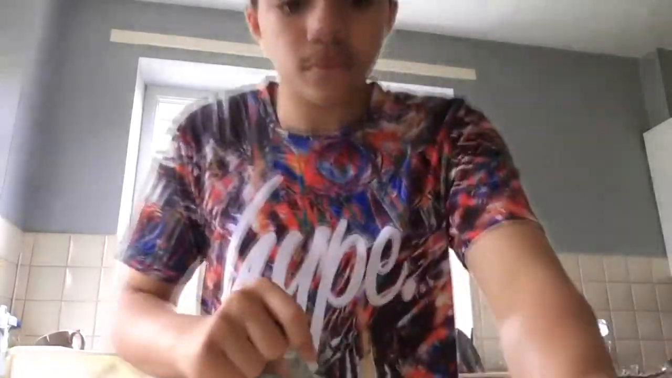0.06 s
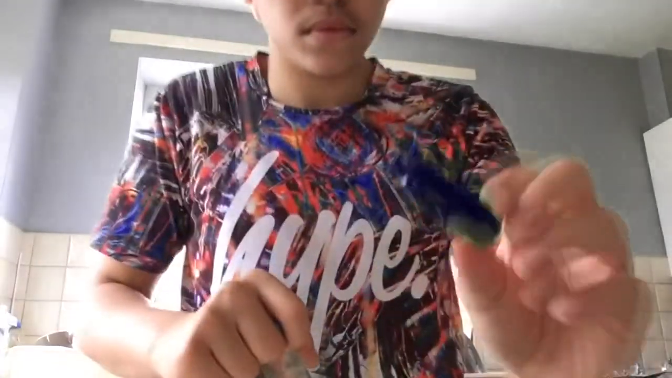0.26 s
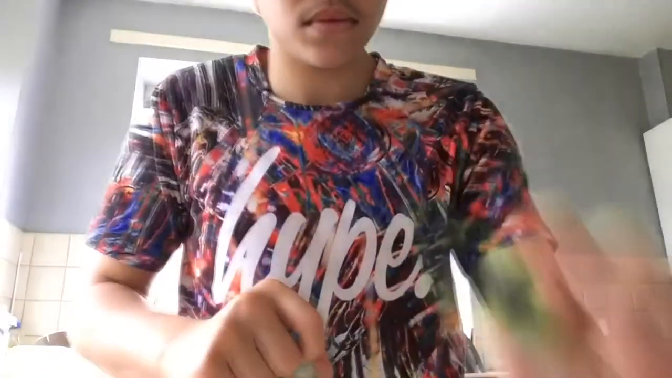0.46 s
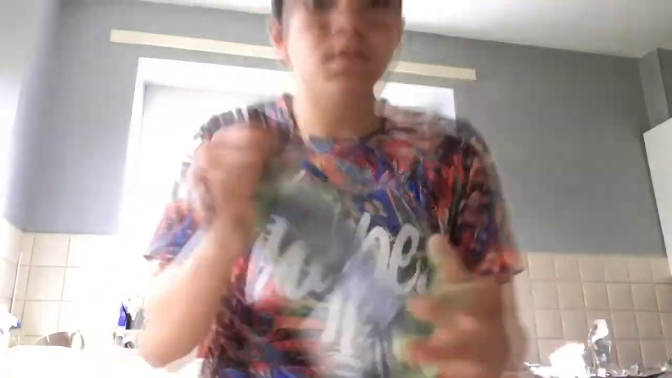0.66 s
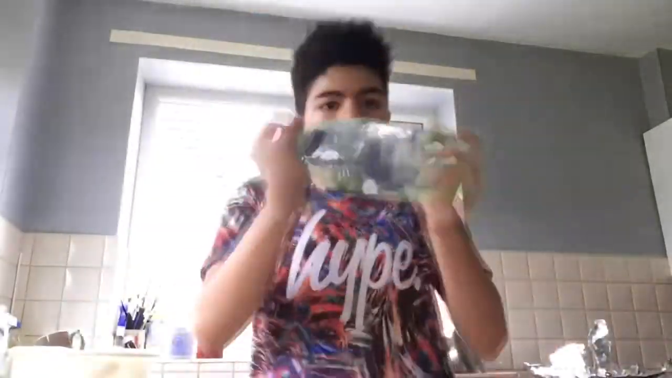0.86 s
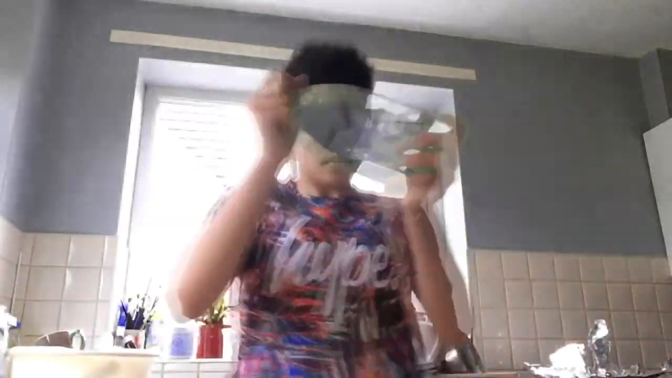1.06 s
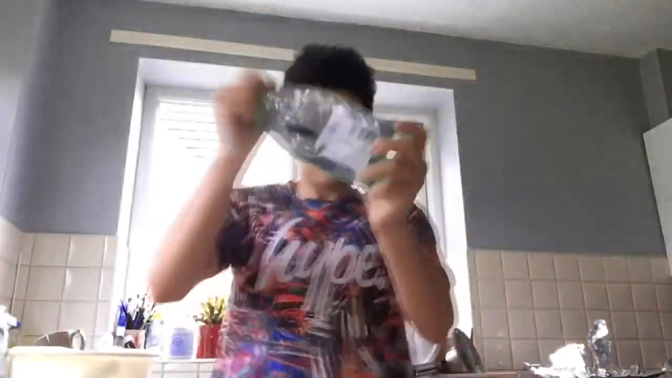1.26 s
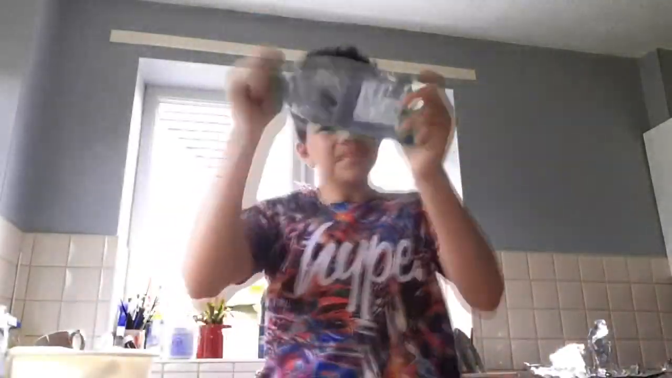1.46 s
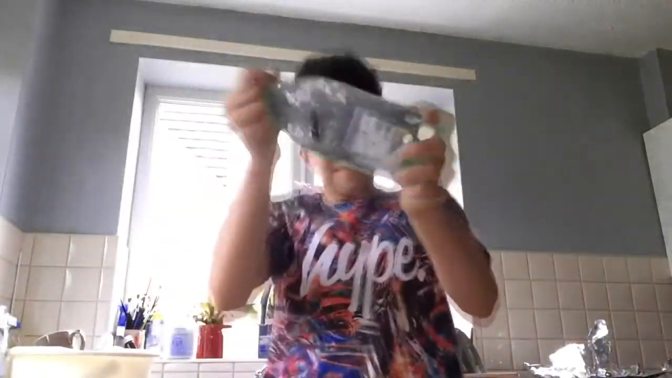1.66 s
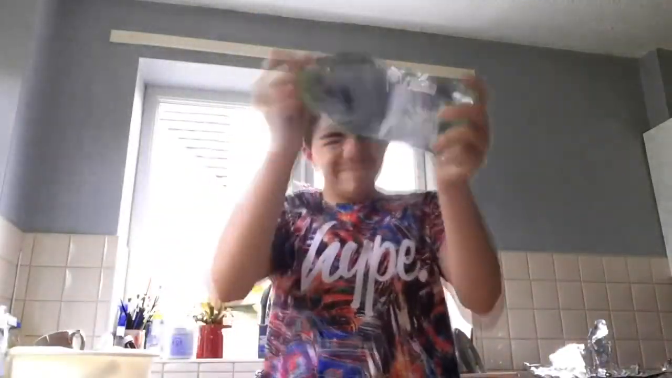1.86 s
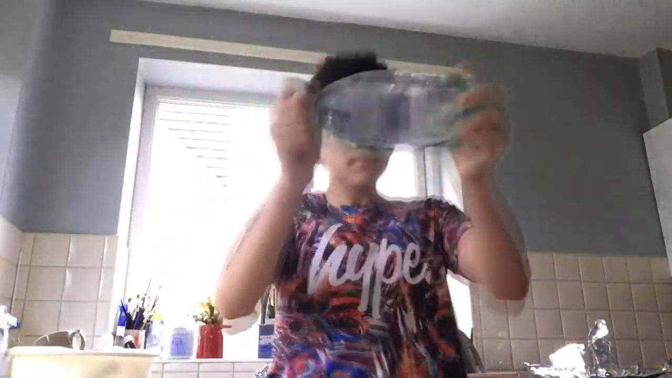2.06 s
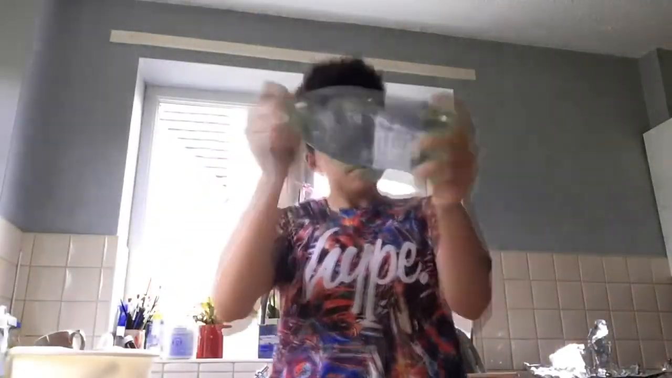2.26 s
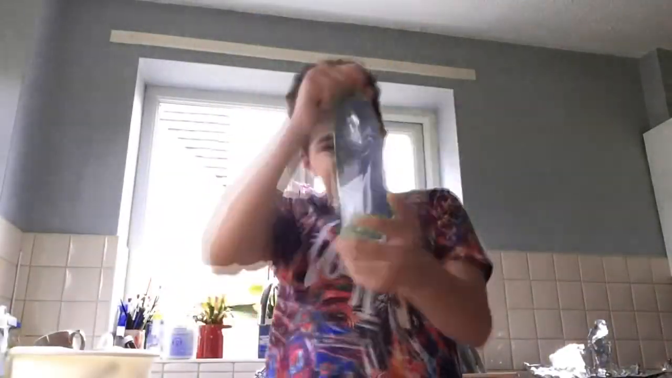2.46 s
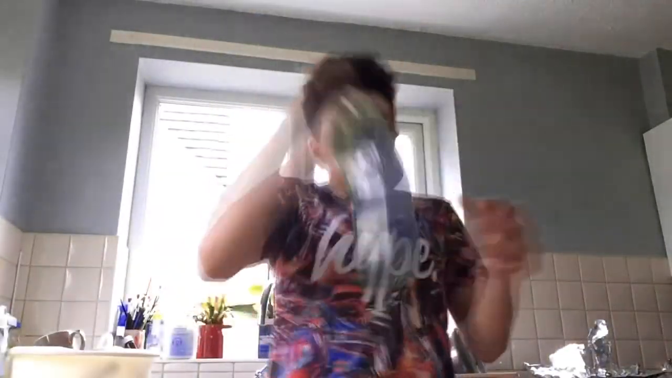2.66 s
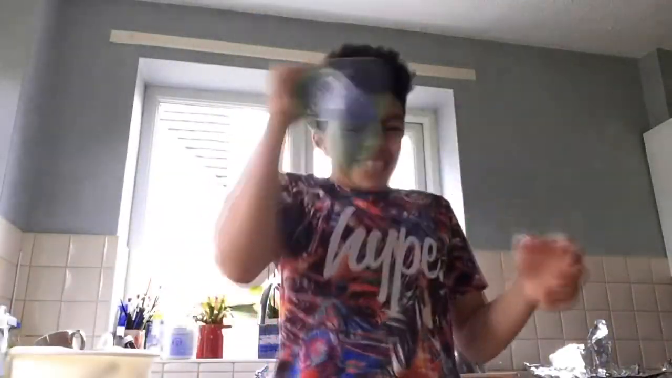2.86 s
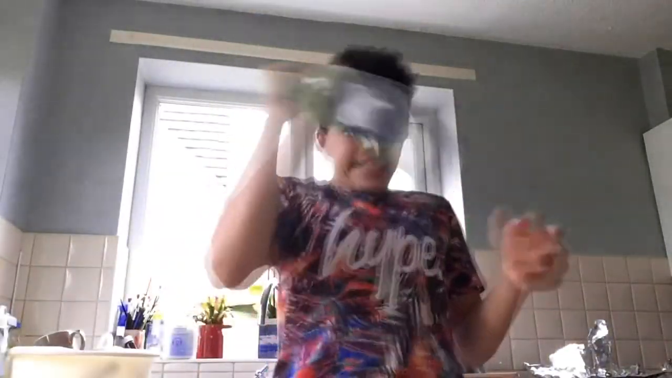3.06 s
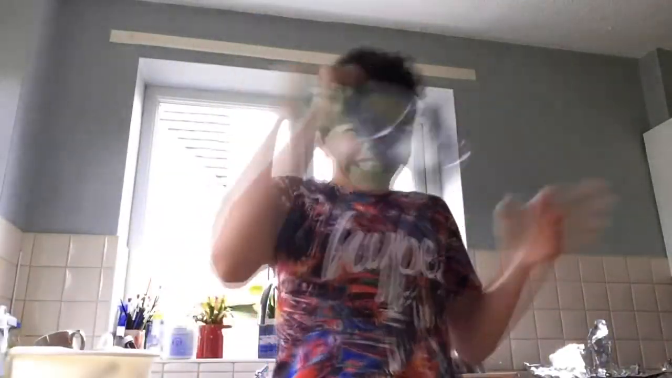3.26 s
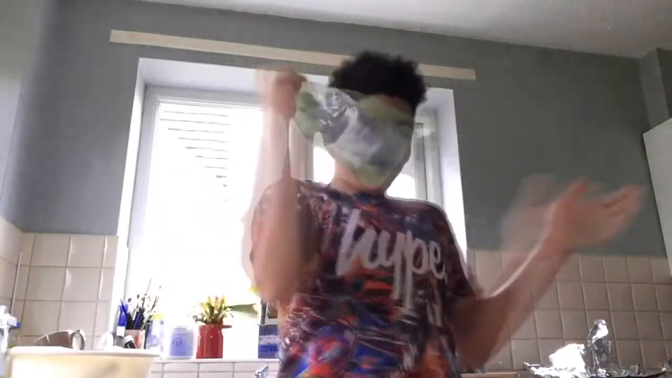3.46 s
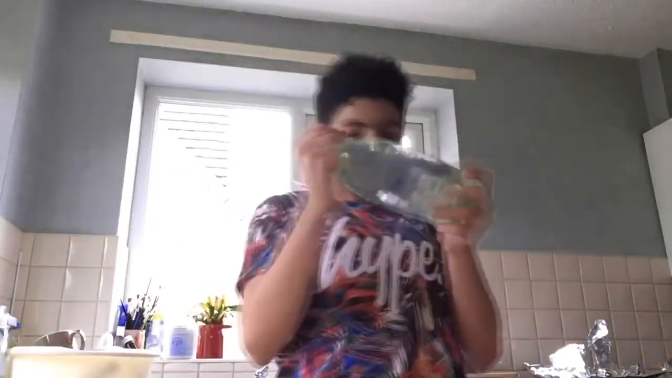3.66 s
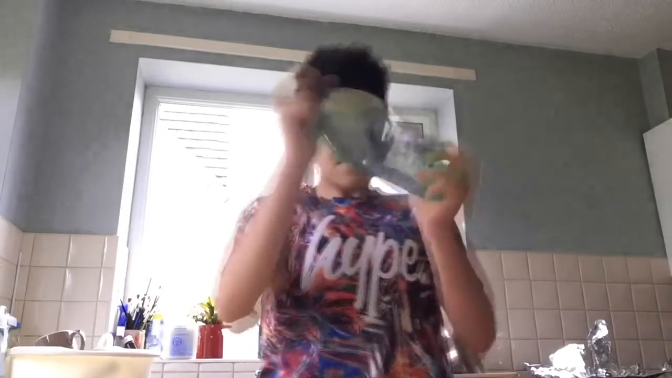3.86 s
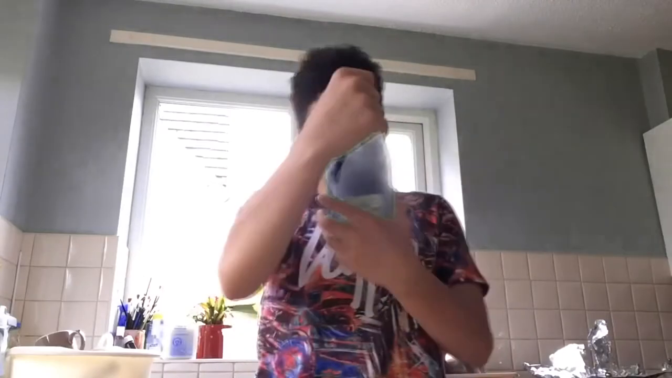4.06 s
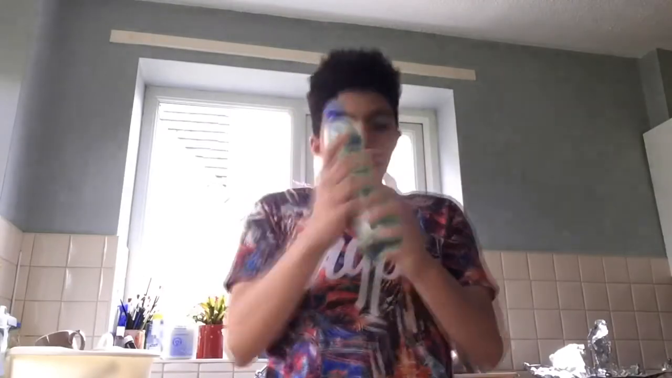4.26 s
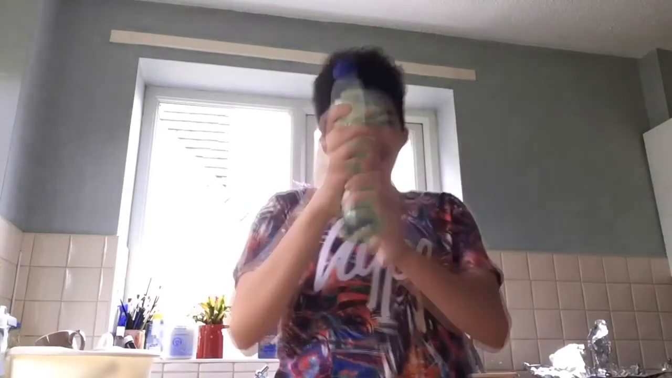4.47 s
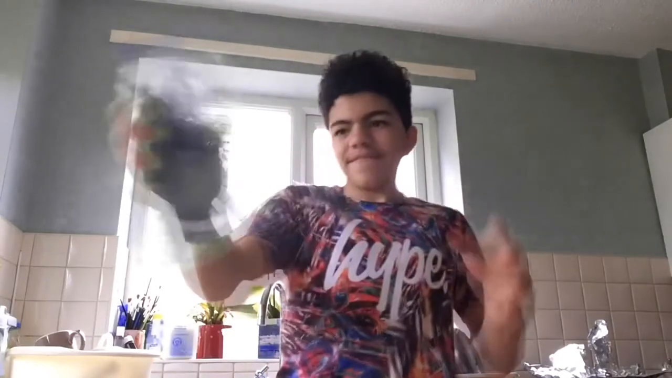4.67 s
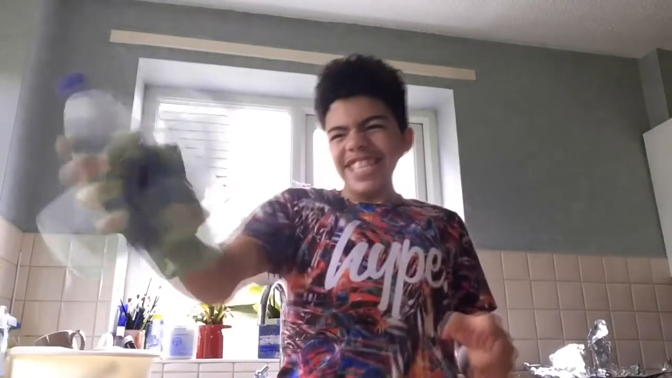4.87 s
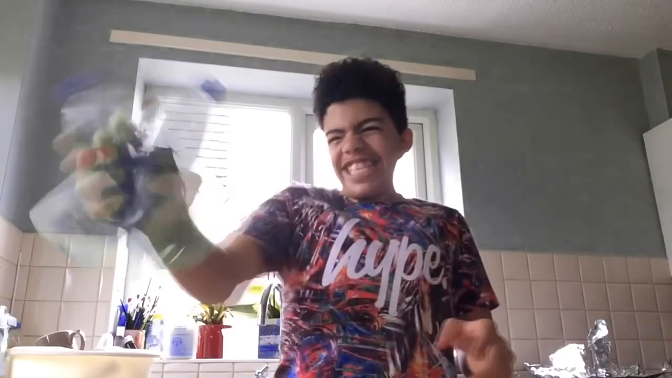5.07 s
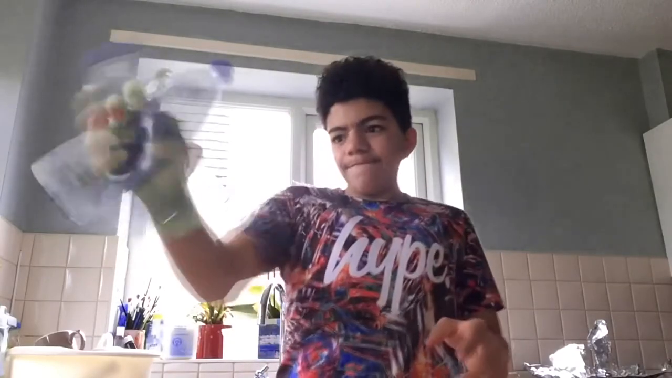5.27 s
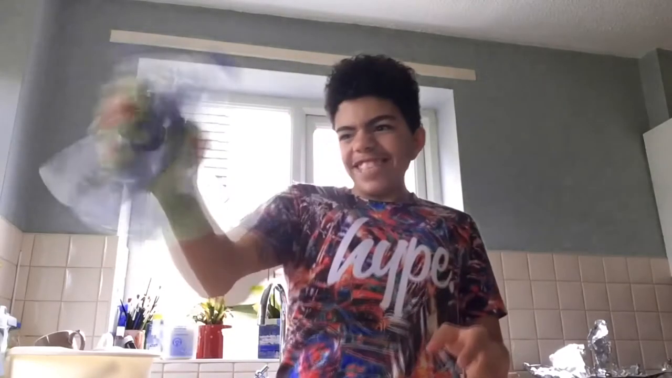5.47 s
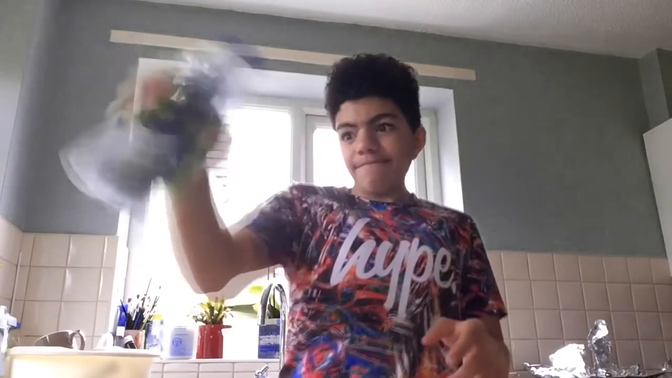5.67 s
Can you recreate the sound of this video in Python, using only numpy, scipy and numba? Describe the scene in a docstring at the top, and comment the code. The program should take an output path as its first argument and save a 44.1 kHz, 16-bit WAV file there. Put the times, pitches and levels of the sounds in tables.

```python
"""Water slams, gurgles and sprays in a part-filled plastic bottle shaken by hand in a tiled kitchen.
First come knocks near the microphone, faint ticks and a loud bright snap; a few ticks return during the shaking.
Each slam pushes modes of wall and air, feeds them noise in lumps and traps bubbles as damped rising tones.
The buckling wall cracks: filtered noise clicks with a rattle. Delay lines give the echo, shaped noise the hush."""
import sys
import numpy as np
from scipy import signal
from scipy.fft import rfft, irfft
from scipy.io import wavfile
from scipy.ndimage import uniform_filter1d
from numba import njit

SR = 44100
rng = np.random.default_rng(int(sys.argv[2]) if len(sys.argv) > 2 else 0)


def waveform_to_disk(signal):
    """Save audio, clipped to [-1, 1], as 16-bit WAV at the path in sys.argv[1]."""
    frames = np.transpose(np.atleast_2d(signal))
    scaled = np.clip(frames, -1, 1) * 32767
    samples = np.round(scaled).astype(np.int16)
    wavfile.write(sys.argv[1], SR, samples)


N = 251804


def water():
    """Slams strike the wall and squeeze air; slams, wakes and churn drive the same modes and bubbles."""
    # water hitting an end of the bottle, nominal levels and decays: t/s, ring/dB, thud/dB re ring,
    # splash/dB re ring, spray/dB re ring, t60/s, air pocket start f/Hz
    slams = [(0.731, -36, -8.5, -20, -50, 0.14, 815), (0.916, -36, -13, -20, -25, 0.26, 865),
             (.957, -40, -18, -3, -16, 0.071, 900), (1.007, -34.5, -17, -18, -4.5, 0.068, 746),
             (1.026, -31.5, -17, -12.5, -30, 0.16, 881), (1.112, -35.5, -17.5, -12.5, -15, 0.25, 880),
             (1.172, -40.5, -25, -1, -12, .09, 994), (1.22, -44.5, -9, -0.5, 0.5, 0.066, 1005),
             (1.241, -36.5, -16, -28, -33, 0.046, 742), (1.334, -34.5, -15, -10, -12, .12, 1086),
             (1.385, -47.5, -19, 3, -10, 0.11, 950), (1.43, -49, -17, 0, -5, .08, 1000),
             (1.479, -48.5, -10, -1, -24, 0.38, 880), (1.572, -43, -28, -8, -9, 0.34, 890),
             (1.618, -33, -13, -8.5, -14.5, 0.27, 733), (1.718, -43, -3.5, 6.5, -9, .08, 770),
             (1.734, -31, -13, -9.5, -36, .17, 1020), (1.821, -47.5, -13, 3, -2, 0.047, 880),
             (1.854, -48, -31, -7, -24, 0.45, 1030), (1.921, -35.5, -15.5, -6.5, -15.5, 0.15, 623),
             (2.022, -34, -10, -11, -13.5, 0.11, 860), (2.119, -34, -8.5, -7, -17, 0.19, 607),
             (2.218, -44.5, -8, -7, -4, 0.043, 850), (2.269, -43.5, -39, -6, -23, .11, 890),
             (2.32, -34, -14.5, -10, -15, 0.12, 1043), (2.414, -39.5, -17.5, -5.5, -6.5, 0.1, 1090),
             (2.627, -48.5, -11, 1, -2, 0.18, 640), (2.684, -40, -8.5, 1, -5, 0.12, 870),
             (2.784, -48, -17.5, -2.5, -2, 0.47, 840), (2.853, -35.5, -13, -8, -10.5, 0.11, 892),
             (2.935, -42.5, -18, -8.5, -5.5, 0.41, 602), (3.005, -34, -14.5, -5, -11, 0.17, 846),
             (3.089, -49.5, -20, -3, 2, 0.11, 846), (3.142, -40.5, -21, -9, -14, 0.35, 832),
             (3.245, -35.5, -30, -8.5, -5.5, 0.086, 1195), (3.292, -37.5, -18, -27, -12, .09, 867),
             (3.339, -46, -34, -17, -29, 0.1, 904), (3.378, -33, -27, -6, -15, 0.19, 913),
             (3.443, -42.5, -29, -11, -30, 0.14, 705), (3.525, -46, -13, 0, -0.5, 0.086, 865),
             (3.598, -34.5, -24, -55, -44, 0.16, 746), (3.666, -46, -7.5, -21, -6.5, 0.11, 885),
             (3.79, -47, -20, -7, -12, 0.2, 850), (3.837, -33.5, -10.5, -10.5, -14, 0.2, 881),
             (3.953, -44.5, -12.5, -4.5, -8.5, 0.24, 896), (4.371, -48, -10, -7, -6, 0.15, 622),
             (4.402, -36.5, -10.5, -11.5, -14, 0.2, 753), (4.443, -34.5, -14, -3, -10, 0.2, 1040),
             (4.473, -31.5, -19, -4.5, -12.5, 0.26, 876), (4.503, -41.5, -16, -8, 1.5, .1, 873),
             (4.554, -33, -28, -9, -10, 0.052, 883), (4.606, -28, -17, -4.5, -14, 0.082, 1070),
             (4.685, -44.5, -15, -2, -5, 0.54, 1080), (4.73, -30.5, -19, -20, -8, 0.15, 862),
             (4.758, -37.5, -32, 7.5, -4, 0.047, 803), (4.782, -30, -19, -9.5, -22, 0.32, 822),
             (4.882, -23, -36, -8, -6, 0.073, 901), (4.916, -23, -29, -8, -34, 0.11, 824),
             (4.968, -30, -35, -9, -22, 0.037, 815), (4.998, -35, -38, 0, -2, 0.069, 802),
             (5.018, -35.5, -37, 6, -2.5, 0.13, 1050), (5.059, -33, -26.5, -8.5, -13, 0.25, 1066),
             (5.153, -38.5, -12.5, -18, -5.5, 0.076, 1028), (5.189, -42, -25, -5, -9, 0.14, 1087),
             (5.253, -44, -19, -26, -4, 0.073, 893), (5.276, -33, -36, -7, -5, 0.039, 1124),
             (5.306, -28.5, -32, -15, -12, 0.05, 850), (5.333, -35, -19.5, -14, -13, .13, 1080),
             (5.356, -29, -29, -14, -23, 0.091, 1000), (5.4, -54, -21, -16, 2, .14, 786),
             (5.443, -38.5, -18, -2, -6.5, 0.15, 677), (5.483, -43.5, -18.5, -22, -6, 0.49, 995),
             (5.546, -28.5, -43, -4.5, -2, 0.095, 1081), (5.605, -40, -16, -24, -26, .15, 1037),
             (5.628, -41.5, -14, -20, -12, 0.071, 1070), (5.68, -40, -35, -22, -11, 0.11, 1097)]
    s, ring_db, thud_db, splash_db, spray_db, t60_s, pocket_hz = np.transpose(slams)
    fizz, gurgle, mist_gain = churning(s, ring_db)
    return (air_pockets(s, ring_db, splash_db, pocket_hz)
            + hollow_ring(s, ring_db, t60_s, gurgle)
            + low_thud(s, ring_db + thud_db, t60_s, gurgle)
            + splashing(s, ring_db + splash_db, t60_s, fizz)
            + spraying(s, ring_db + spray_db, t60_s, fizz, mist_gain))


def churning(slam_s, ring_db):
    """Envelopes of tumbling water: steady churn that lulls while water flies, plus the wake of each slam."""
    # steady churn: t/s, fizz/dB, gurgle/dB, finest mist/dB re spray
    churn = [(0.7, -104.5, -74.5, -4), (0.95, -65, -66.5, -1.5), (1.09, -60.5, -57, -5),
             (1.44, -66.5, -62, -2.5), (1.77, -63.5, -59.5, -3.5), (2.25, -62, -58.5, -0.5),
             (2.46, -66.5, -65, -3.5), (2.72, -77, -72, -2), (2.86, -75, -80, -7), (3.32, -57.5, -53, -5),
             (3.48, -62, -56, -2), (3.62, -72.5, -71, -8), (3.81, -76.5, -67, -6), (4.09, -92, -80, -1),
             (4.31, -82, -79, 6), (4.43, -58, -66, -3.5), (4.56, -69, -56, -4), (4.82, -50, -51.5, -5),
             (4.91, -47.5, -41.5, -8), (5.08, -57, -62, -4), (5.63, -55, -58, -3), (5.71, -61, -66, -1)]
    times, *columns = np.transpose(churn)
    t = np.arange(N) / SR
    fizz_db, gurgle_db, mist_db = (np.interp(t, times, c, left=-120) for c in columns)

    lull_db, lull_s = -3.5, 0.056
    next_slam_s = np.append(slam_s, np.inf)[np.searchsorted(slam_s, t)]
    lull = undb(lull_db * np.exp((t - next_slam_s) / lull_s))

    def wake(re_ring_db):
        return bursts(slam_s, ring_db + re_ring_db, t60_s=0.18, rise_s=0.018, hold=1.264)

    fizz = np.hypot(lull * undb(fizz_db), wake(-29.5))
    gurgle = np.hypot(lull * undb(gurgle_db), wake(-29))
    return fizz, gurgle, undb(mist_db)


def air_pockets(s, ring_db, splash_db, pocket_hz):
    """One squeezed air pocket per slam; the less it splashes, the louder the pocket re ring."""
    pocket_db, per_splash_db = -7.5, -0.07
    return gulps(s, ring_db + pocket_db + per_splash_db * splash_db, pocket_hz, cycles=21.4, glide=0.024)


def hollow_ring(s, ring_db, t60_s, gurgle):
    """Middle modes of wall and air, struck by a push and fed by lumpy noise, with mid-sized bubbles."""
    # modes of wall and air: f/Hz, width/Hz, level/dB
    ring_modes = [(592.5, 82, -2.5), (643, 43, -0.5), (734, 59, 1), (829, 76, 0), (872.5, 26.3, 2.5),
                  (958, 57, -3.5), (1068, 40, 1.5), (1197, 160, -0.5), (1328, 88, -7)]
    ring = np.hypot(bursts(s, ring_db - 11.5, 0.83 * t60_s, rise_s=0.0021, hold=1.24), gurgle)
    push = blows(s, ring_db + 11.5)
    noise = undb(-2.0) * ring * droplets(grain_s=0.0053, spread_db=4.0)
    pops = bubbles(ring, count=1680, lo_hz=600, hi_hz=1262, cycles=11.6, glide=0.061)
    return body(push + noise, ring_modes) + undb(-1.5) * pops


def low_thud(s, thud_db, t60_s, gurgle):
    """Low modes of wall and air, struck by a push and fed by lumpy noise."""
    # low modes: f/Hz, width/Hz, level/dB
    thud_modes = [(129, 120, -12), (211.7, 23.6, -3.5), (294.6, 54, -3), (343.8, 16.7, -1.5),
                  (456.2, 18.4, -4.5)]
    thud = np.hypot(bursts(s, thud_db + 4.5, 0.4 * t60_s, rise_s=0.0032, hold=1.02), undb(-5.0) * gurgle)
    push = blows(s, thud_db + 25.0)
    return body(push + thud * droplets(grain_s=.008, spread_db=3.5), thud_modes)


def splashing(s, splash_db, t60_s, fizz):
    """Drops feed the upper modes separately; small bubbles sound where the splash is loud."""
    # splash modes: f/Hz, width/Hz, level/dB
    splash_modes = [(1600, 130, -3.5), (1964, 360, 1.5), (2044, 310, -3), (2730, 800, 1.5),
                    (3226, 140, -4.5), (3800, 120, -13.5)]
    splash = np.hypot(bursts(s, splash_db - 10.5, 1.27 * t60_s, rise_s=0.0006, hold=1.04), fizz)
    drops = patchy(undb(-1.0) * splash, splash_modes, grain_s=.006, spread_db=4.5)
    pops = bubbles(splash, count=4200, lo_hz=1293, hi_hz=4406, cycles=13.2, glide=0.071)
    return drops + undb(-1.1) * pops


def spraying(s, spray_db, t60_s, fizz, mist_gain):
    """Fine drops and finer mist in broad treble bands, with tiny bubbles."""
    # treble bands of spray, then of the finest mist: f/Hz, width/Hz, level/dB
    spray_modes = [(4100, 2900, -2.4), (5800, 1600, -0.61), (7650, 1440, 0.026)]
    mist_modes = [(10600, 3400, -0.61), (13600, 6200, -0.95)]
    spray = np.hypot(bursts(s, spray_db - 9.5, 1.8 * t60_s, rise_s=0.0009, hold=0.89), undb(-3.0) * fizz)
    drops = patchy(spray, spray_modes, grain_s=0.0055, spread_db=3.5)
    mist = patchy(spray * mist_gain, mist_modes, grain_s=0.004, spread_db=4.5)
    pops = bubbles(spray, count=1980, lo_hz=4070, hi_hz=10340, cycles=45.0, glide=0.054)
    return drops + mist + undb(-11.5) * pops


def plastic():
    """Each crack is a short click, then a brief rattle of the patch of wall that buckled, in its own colour."""
    # wall cracks, nominal levels: t/s, level/dB, colour f/Hz, rattle/dB re click
    cracks = [(0.859, -44.5, 2470, -8), (0.909, -33.5, 3520, 4), (1.009, -29.5, 1800, 5),
              (1.114, -34, 5900, -7), (1.2286, -34, 2660, -12), (1.3254, -46, 2210, -2),
              (1.5202, -33, 5960, -11), (1.6194, -33, 2030, 18), (1.72, -30.5, 2100, 6),
              (1.921, -30.5, 2590, -15), (2.021, -38, 2190, -2), (2.1205, -29.5, 2400, -1),
              (2.216, -33, 2180, -2), (2.4196, -33.5, 3080, -4), (2.486, -42, 2750, 0),
              (2.5327, -42.5, 9100, -7), (2.619, -37, 7950, -7), (2.6893, -29, 2050, -5),
              (2.7834, -31.5, 6200, -4.5), (2.848, -34.5, 2480, 0.5), (2.9412, -53, 2800, -8),
              (3.0098, -43, 2080, -1), (3.1596, -30.5, 3100, -8), (3.6631, -43.5, 2830, -14),
              (3.667, -41, 2830, -8), (3.8384, -32, 2820, -3), (3.9487, -44, 2180, -5),
              (4.1872, -45.5, 2430, -7), (4.375, -48, 2450, -5), (4.44, -18.5, 3380, 2),
              (4.4733, -25, 2150, -4), (4.6051, -24.5, 3260, -7), (4.684, -43, 3450, -5),
              (4.8809, -9, 3570, -18), (4.9993, -20.5, 2390, -7), (5.018, -21, 2740, -8),
              (5.1102, -32.5, 2700, -3), (5.2764, -27, 2170, -14), (5.307, -38, 2160, -19),
              (5.3708, -14.5, 2760, -18), (5.548, -14, 8100, -12.5)]
    out, size = np.zeros(N + SR), SR // 8
    t = np.arange(size) / SR
    for s, db, hz, rattle_db in cracks:
        noise = rng.standard_normal(size)
        click = noise * 1000 ** (-t / 0.003)
        push = click + noise * undb(rattle_db) * 1000 ** (-t / 0.11)
        broad = svf(svf(click, 1.14 * hz, 5.9 * hz), 1.13 * hz, 4.9 * hz)
        narrow = svf(push, hz, 0.19 * hz)
        crack = 1.74 * broad + undb(-19.0) * push + 2.95 * narrow
        out[int(s * SR):][:size] += undb(db - 5.5) * crack / np.abs(crack).max()
    return out[:N]


def snap():
    """Bright modes struck by sudden pushes and fed by a short and a longer noise burst."""
    # snap and after-clicks, nominal: t/s, level/dB
    snaps = [(0.5744, -1), (0.5812, 0), (0.5903, -14), (0.5966, -27), (0.6148, -23), (0.6647, -44),
             (0.6844, -47)]
    # snap modes: f/Hz, width/Hz, level/dB
    snap_modes = [(2550, 2700, -7.5), (3340, 1330, -2), (5200, 990, -3.5), (7840, 1900, -1.5),
                  (9040, 620, -5), (11600, 4500, 2.5), (15300, 1700, 1)]
    s, db = np.transpose(snaps)
    rattle = bursts(s, db - 12, t60_s=0.0018, rise_s=.0001) + bursts(s, db - 20.5, t60_s=0.097, rise_s=0.00082)
    return body(blows(s, db + 4) + rattle * droplets(grain_s=0.0015, spread_db=1.5), snap_modes)


def knocks():
    """Dull thumps of band-passed noise with a lumpy scrape on top."""
    # handling near the microphone, nominal: t/s, thump/dB, scrape/dB re thump, t60/s
    knock_table = [(0.031, -39.5, 8.5, 0.05), (0.047, -51, 15, 0.062), (0.061, -53, 19.5, 0.064),
                   (0.069, -58, -1, 0.12), (0.122, -65, 11, 0.049), (0.577, -42.5, 20.5, 0.15)]
    s, thump_db, scrape_db, t60_s = np.transpose(knock_table)
    thump = bursts(s, thump_db + 20.5, 0.56 * t60_s, rise_s=0.00075) * rng.standard_normal(N)
    thump = svf(svf(thump, 270.0, 470.0), 400., 901.0)
    scrape = bursts(s, thump_db + scrape_db - 5.0, t60_s, rise_s=0.0062)
    return thump + scrape * droplets(grain_s=0.0011, spread_db=4.0)


def ticks():
    """Very short noise bursts ring thin treble modes."""
    # faint ticks, nominal: t/s, level/dB
    tick_table = [(0.1945, -47), (0.2, -54), (0.2284, -59), (0.2364, -60), (0.2574, -56), (0.2844, -70),
                  (0.4776, -60), (0.549, -46), (0.5595, -48.5), (0.564, -35), (4.31, -56), (4.337, -57),
                  (4.347, -50), (4.357, -55)]
    # tick modes: f/Hz, width/Hz, level/dB
    tick_modes = [(7300, 500, -4), (9500, 3900, -10.5), (14700, 1500, -4.5)]
    s, db = np.transpose(tick_table)
    return body(bursts(s, db + 0.5, t60_s=0.01, rise_s=0.00044) * rng.standard_normal(N), tick_modes)


def kitchen_echo(near):
    """Reflections off the tiles: loop gains set by t60, treble lost faster."""
    t60_s, damp, level_db = 0.15, 0.138, -18.5  # t60 before damping
    lags = np.array([331, 457, 613, 787, 977, 1213, 1471, 1753])  # samples
    return undb(level_db) * walls(near, lags, undb(-60 * lags / SR / t60_s), damp)


def hush():
    """Quiet room tone and microphone hiss: uneven noise with a fixed spectrum."""
    # relative spectrum before scaling: f/Hz, density/dB per Hz
    hush_spectrum = [(18, -66.5), (30, -28), (98, -14.5), (215, -8), (384, -20), (889, -20.5), (1100, -23),
                     (1670, -28.5), (1860, -27), (3310, -31.5), (16000, -39.5)]
    level_db = -72
    f_hz, density_db = np.array(hush_spectrum).T
    hz = np.maximum(np.arange(N // 2 + 1) * SR / N, 1)
    colour_db = np.interp(np.log(hz), np.log(f_hz), density_db)
    noise = droplets(grain_s=0.03, spread_db=1.4)
    return undb(level_db) * unit(irfft(rfft(noise) * undb(colour_db), N))


def gulps(times, db, pitch_hz, cycles, glide):
    """Squeezed air pockets: damped tones whose pitch rises by the fraction glide over their length."""
    out = np.zeros(N + SR)
    for s, gain, hz in zip(times, undb(db), pitch_hz):
        c = np.arange(int(3 * cycles * SR / hz)) * hz / SR  # cycles elapsed at the starting pitch
        tone = np.sin(2 * np.pi * c * (1 + glide * c / (6 * cycles)))
        out[int(s * SR):][:len(c)] += gain * tone * np.exp(-2 * c / cycles)
    return out[:N]


def bubbles(activity, count, lo_hz, hi_hz, cycles, glide):
    """Small pockets at random moments and sizes, loud where the water is busy."""
    when, pitch, size = rng.random((count, 3)).T
    db = 20 * np.log10(activity[(when * N).astype(int)] * np.sqrt(-np.log(size)))
    return gulps(when * N / SR, db, lo_hz * (hi_hz / lo_hz) ** pitch, cycles, glide)


def blows(times, db):
    """One single-sample push, of random sign, at each time."""
    push = np.zeros(N)
    push[(times * SR).astype(int)] = undb(db) * np.sign(rng.standard_normal(len(times)))
    return push


def bursts(times, db, t60_s, rise_s, hold=0.8):
    """Envelope of blows with quick rise and decay, powers added; hold above 1 stays up longer, then drops."""
    power = np.zeros(N)
    for s, gain, tail_s in np.broadcast(times, undb(db), np.maximum(t60_s, .002)):
        start = int(s * SR)
        t = np.arange(min(int(1.5 * tail_s * SR), N - start)) / SR
        rise = 1 - np.exp(-t / rise_s)
        decay = 1000 ** -(t / tail_s) ** hold
        power[start:][:len(t)] += (gain * rise * decay) ** 2
    return np.sqrt(power)


def droplets(grain_s, spread_db):
    """Noise in lumps of uneven size, as from many drops landing; rms 1."""
    k = max(int(grain_s * SR), 1)
    size = undb(spread_db * np.minimum(rng.exponential(size=N // k + 1), 4))
    lumps = uniform_filter1d(np.repeat(size, k)[:N], k)
    return unit(lumps * rng.standard_normal(N))


def patchy(envelope, modes, grain_s, spread_db):
    """Every mode is fed by drops of its own, so the colour keeps shifting."""
    weight = undb(np.array(modes)[:, 2])
    weight = weight / np.linalg.norm(weight)
    return sum(g * body(envelope * droplets(grain_s, spread_db), [m]) for g, m in zip(weight, modes))


def body(push, modes):
    """A push through parallel modes of alternating sign, scaled so unit white noise comes out at rms 1."""
    def ring(x):
        return sum((-1) ** k * undb(db) / np.sqrt(width) * svf(x, 1. * hz, 1. * width)
                   for k, (hz, width, db) in enumerate(modes))

    click = np.zeros(SR // 4)
    click[0] = 1
    return ring(push) / np.linalg.norm(ring(click))


@njit
def svf(x, hz, width):
    """State-variable band-pass, gain 1 at the centre."""
    y, band, low = np.empty(len(x)), 0., 0.
    g, k = np.tan(np.pi * hz / SR), width / hz
    for i in range(len(x)):
        v = (band + g * (x[i] + 1e-18 - low)) / (1 + g * (g + k))  # offset avoids denormals
        band, low, y[i] = 2 * v - band, low + 2 * g * v, k * v
    return y


@njit
def walls(x, lags, gain, damp):
    """Eight delay lines that feed each other, duller on every round."""
    line, soft, out = np.zeros((8, 4096)), np.zeros(8), np.zeros(len(x))
    for i in range(len(x)):
        total = 0.
        for k in range(8):
            soft[k] += (1 - damp) * (gain[k] * line[k, (i - lags[k]) & 4095] - soft[k])
            total += soft[k]
        out[i] = total
        for k in range(8):
            line[k, i & 4095] = x[i] + soft[k] - total / 4
    return out


def undb(db):
    """Gain of a level in dB."""
    return 10 ** (np.asarray(db) / 20)


def unit(x):
    """Scaled to rms 1."""
    return x / np.sqrt(np.mean(x ** 2))


def scene():
    """Bottle and handling, their echo off the tiles, and the room tone."""
    near = water() + plastic() + snap() + knocks() + ticks()
    return (near + kitchen_echo(near) + hush())[None]


def record(dry):
    """The microphone loses the deep bass and rounds the loudest peaks; the recorder cuts the top."""
    top_hz = 16000
    thin = signal.sosfilt(signal.butter(2, 70, "high", fs=SR, output="sos"), dry)
    rounded = .8 * np.tanh(thin / .8)
    return signal.sosfilt(signal.ellip(10, .2, 75, top_hz, fs=SR, output="sos"), rounded)


dry = scene()
out = record(dry)
waveform_to_disk(out)
```